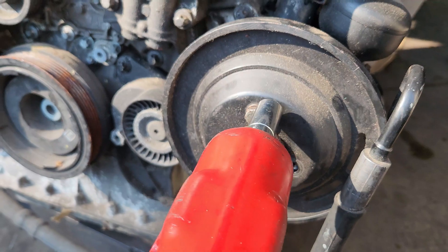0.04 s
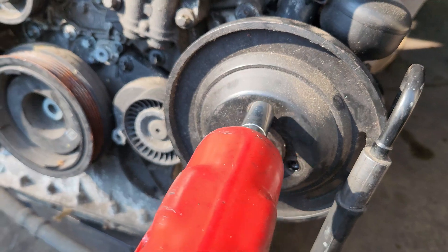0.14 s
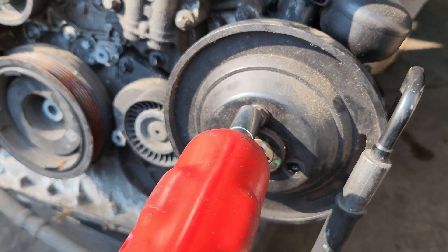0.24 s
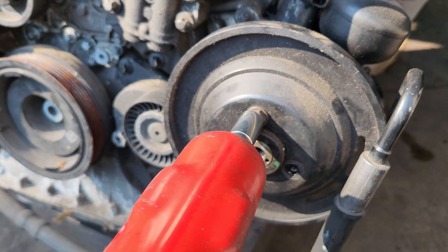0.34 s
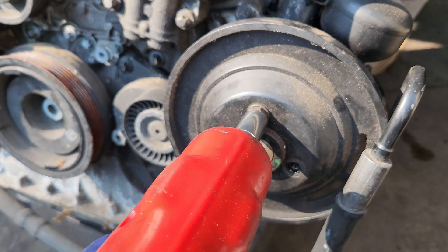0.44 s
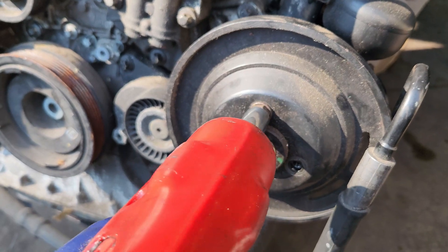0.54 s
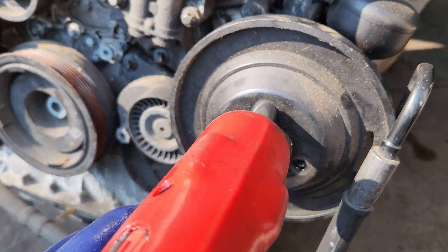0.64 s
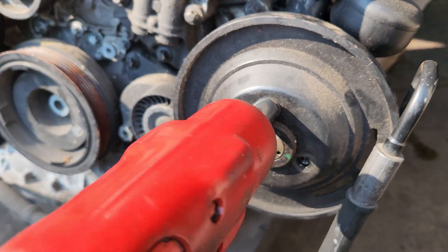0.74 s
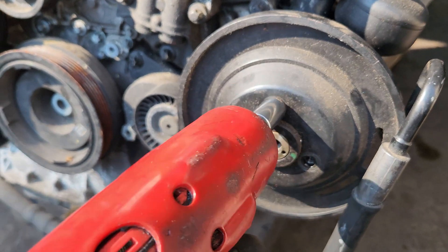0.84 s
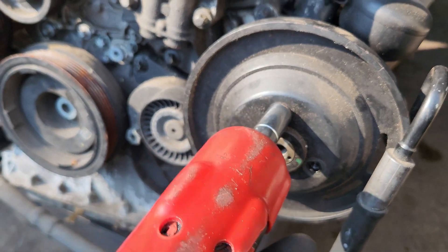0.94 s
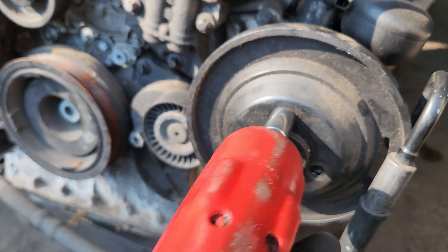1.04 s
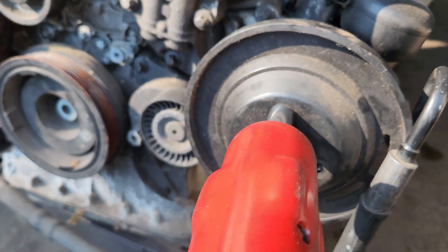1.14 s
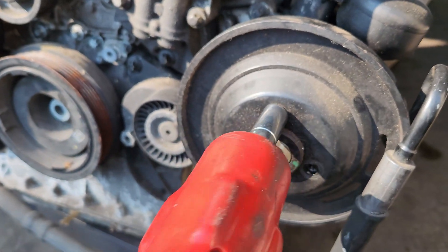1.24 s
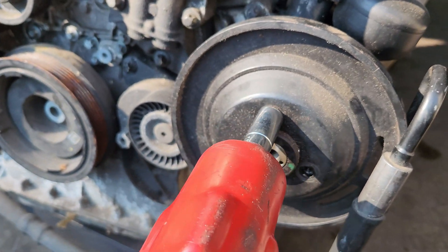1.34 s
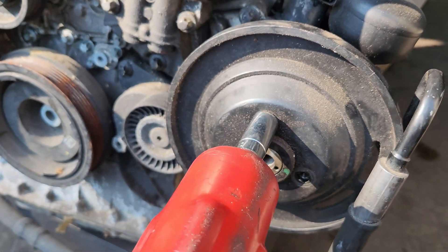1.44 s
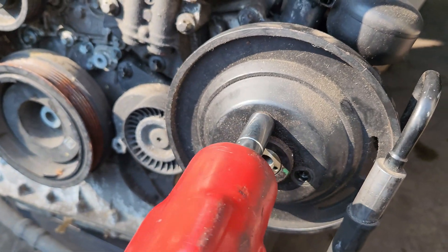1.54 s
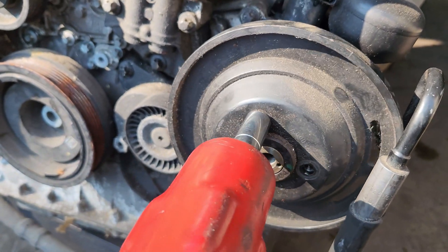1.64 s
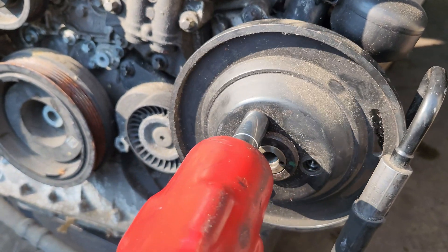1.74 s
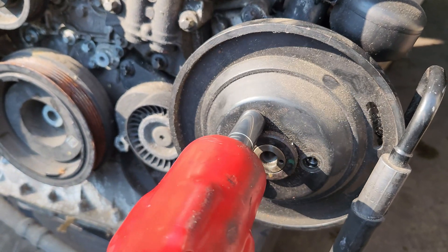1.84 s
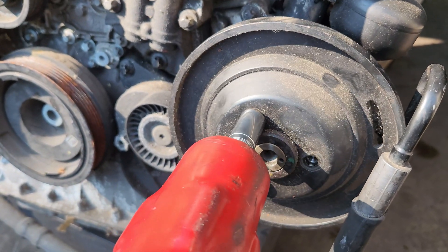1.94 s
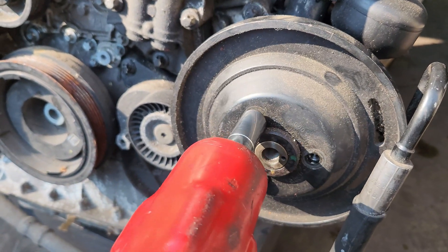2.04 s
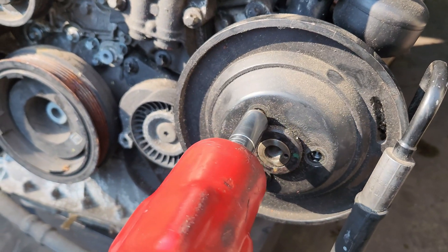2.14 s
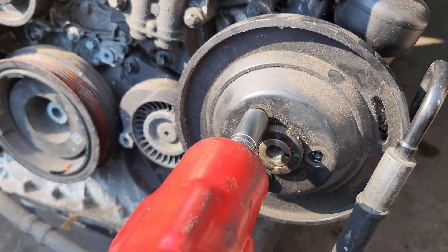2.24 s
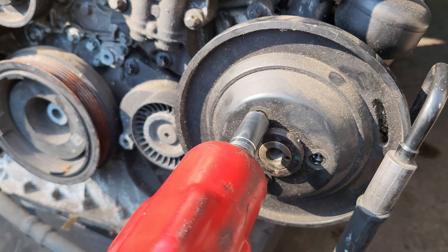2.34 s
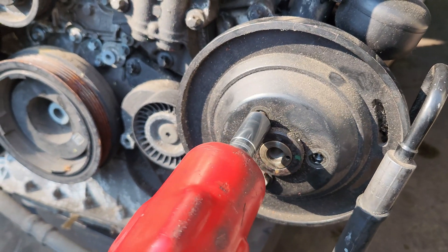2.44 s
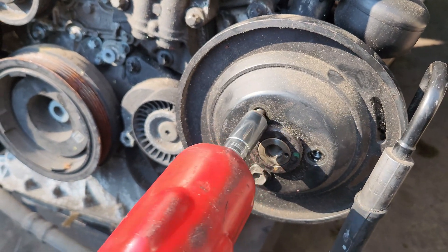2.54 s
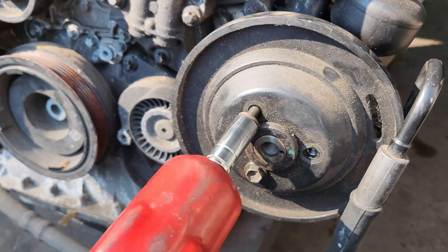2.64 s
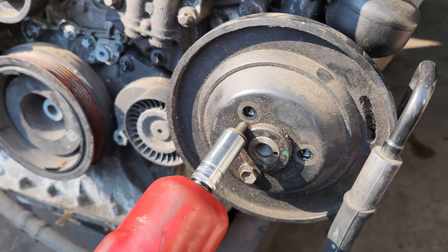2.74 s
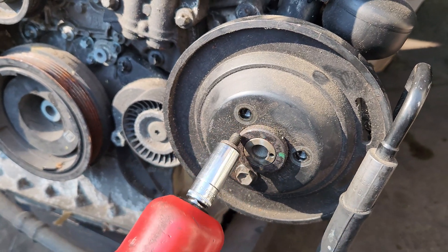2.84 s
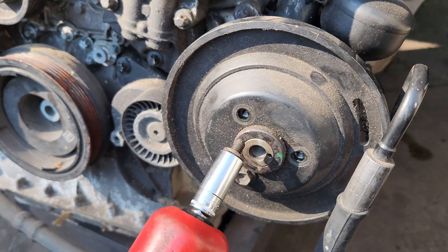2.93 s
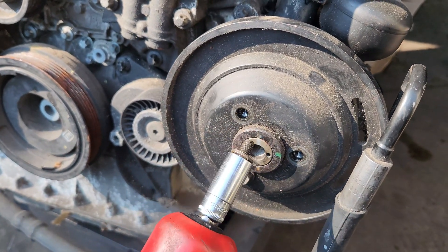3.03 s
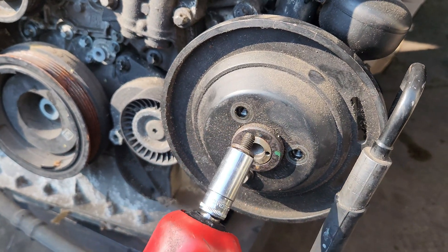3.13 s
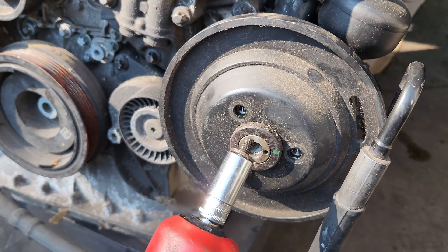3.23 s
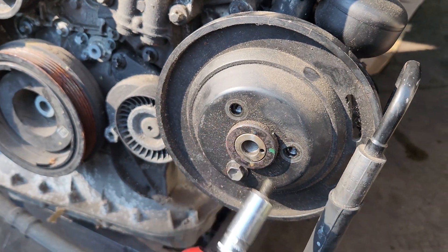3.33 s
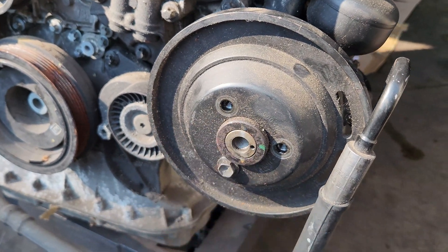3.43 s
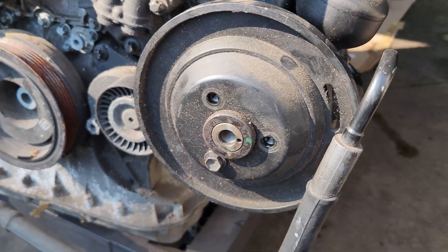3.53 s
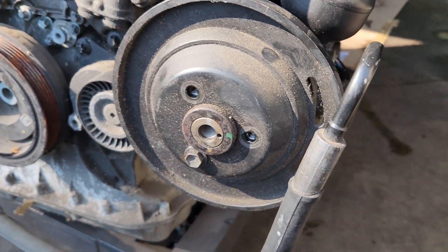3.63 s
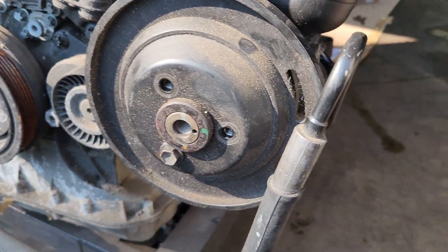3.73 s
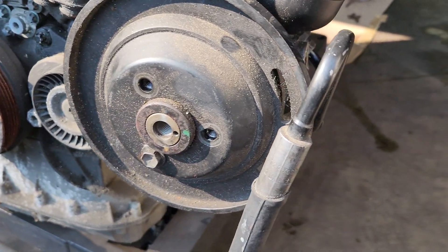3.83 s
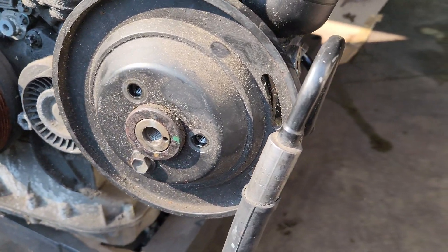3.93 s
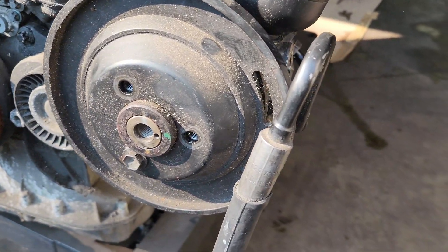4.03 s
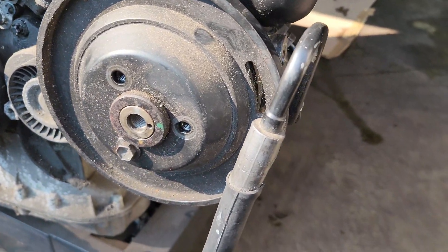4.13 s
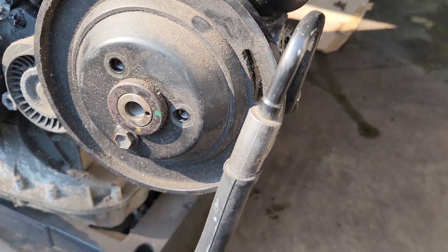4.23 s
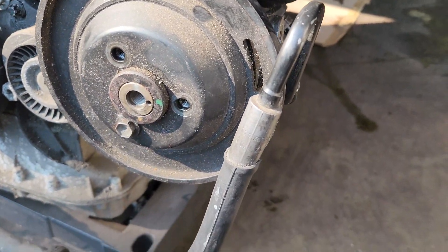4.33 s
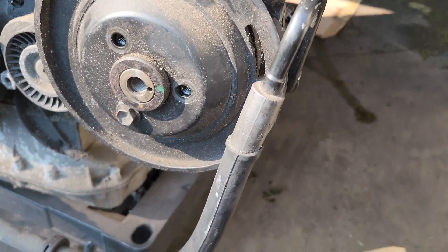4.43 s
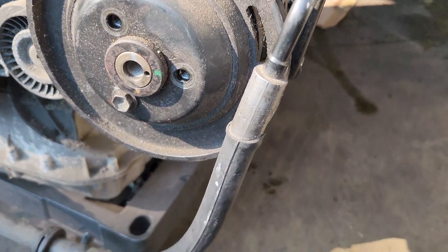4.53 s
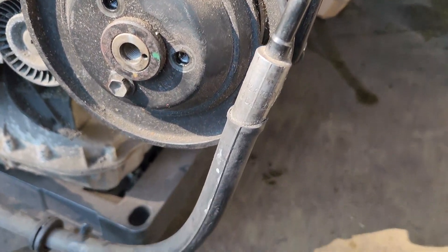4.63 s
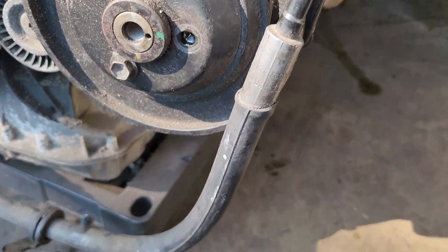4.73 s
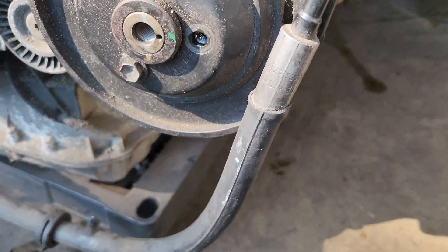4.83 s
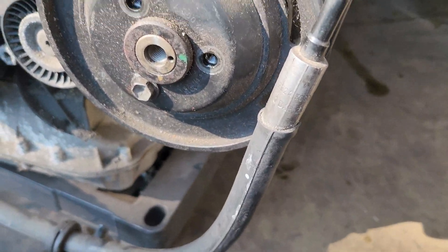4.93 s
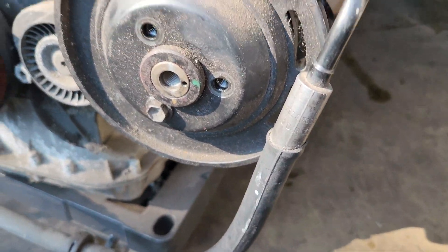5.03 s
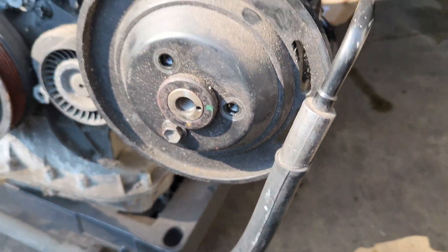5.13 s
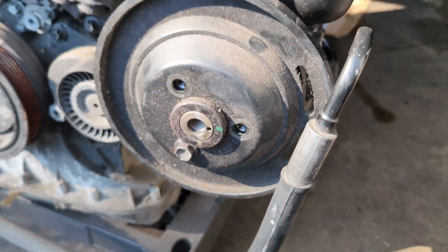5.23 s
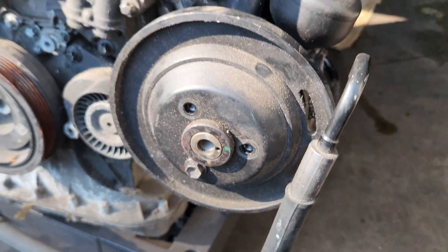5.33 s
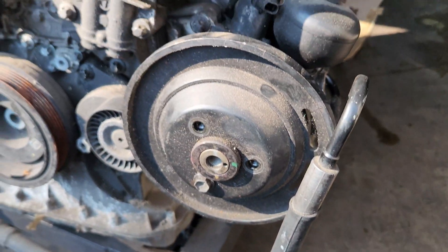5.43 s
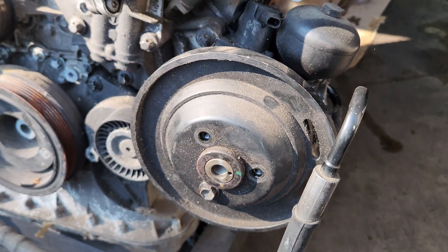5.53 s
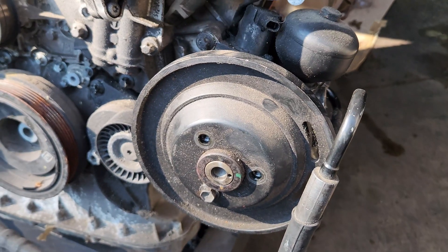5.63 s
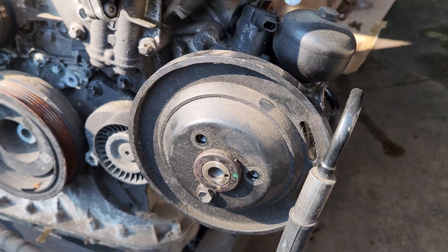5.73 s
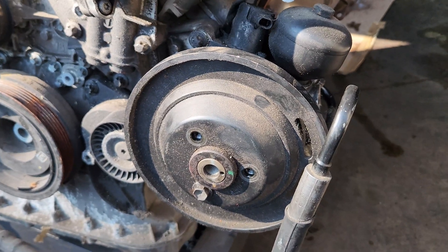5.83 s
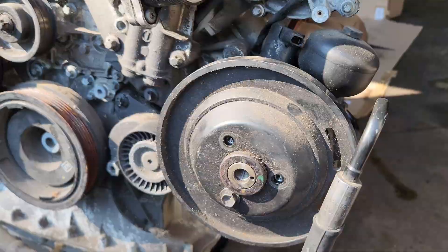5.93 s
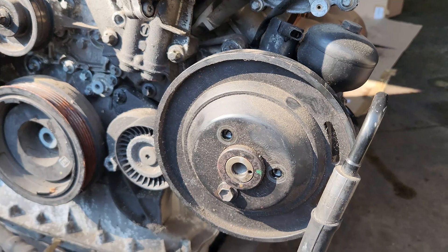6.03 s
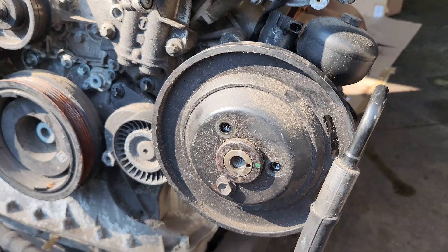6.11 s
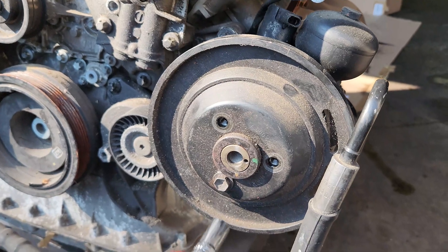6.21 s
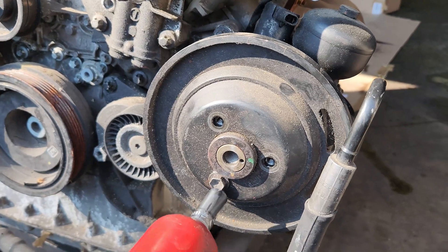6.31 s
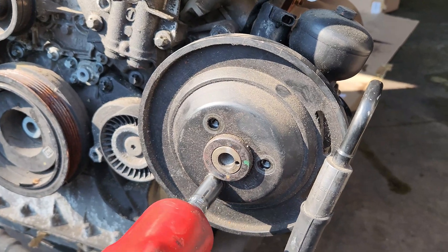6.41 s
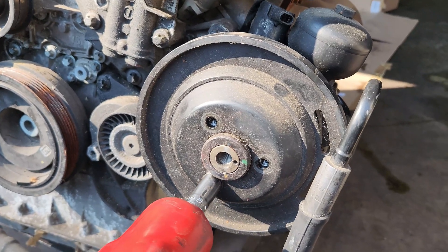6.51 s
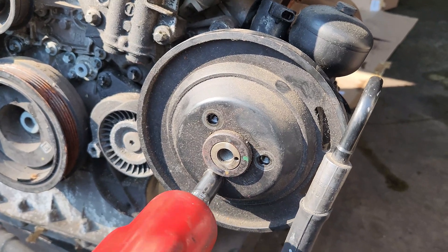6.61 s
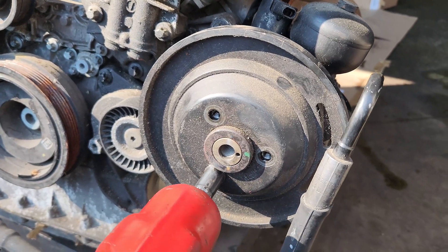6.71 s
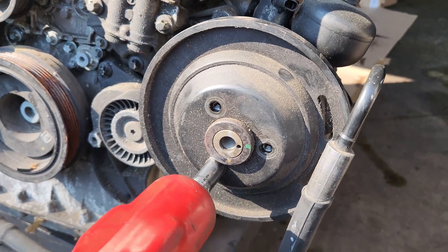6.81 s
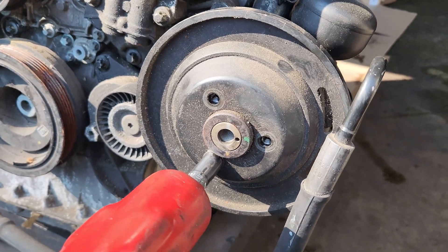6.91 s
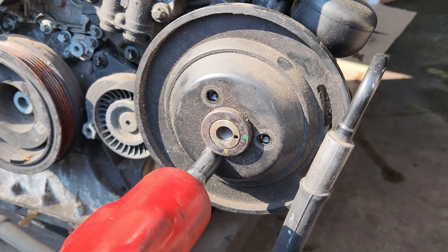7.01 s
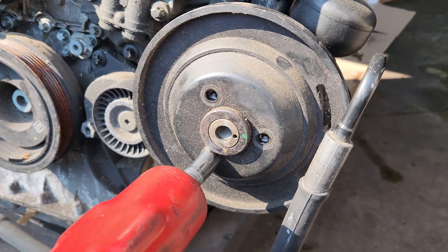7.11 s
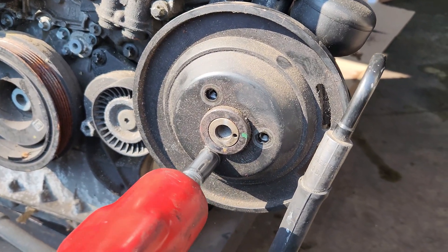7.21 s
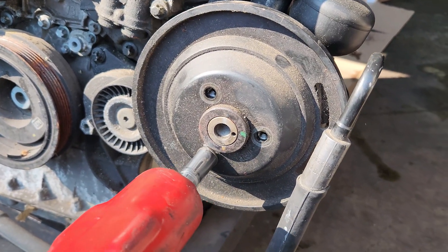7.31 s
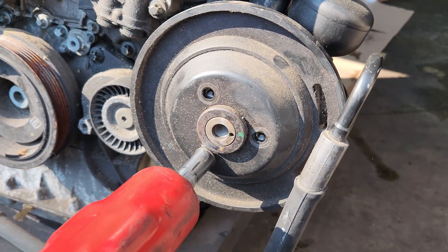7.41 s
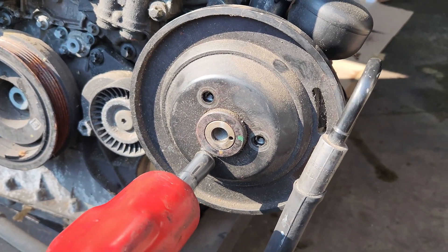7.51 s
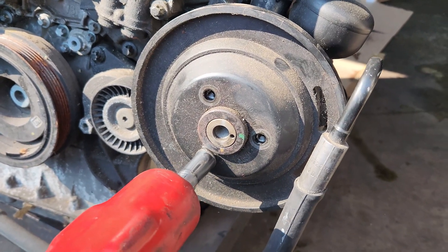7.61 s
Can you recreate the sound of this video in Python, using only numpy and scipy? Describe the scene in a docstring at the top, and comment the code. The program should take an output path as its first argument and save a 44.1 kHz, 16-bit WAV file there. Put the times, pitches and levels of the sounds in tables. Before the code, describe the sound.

Light steel clicks and dull knocks come first, over faint low workshop rumble. Then very loud, irregular hammer blows rattle for under half a second, giving way to whirring gears and a whine that drops abruptly as it stops. A bolt tumbles in a tray with bright clanks, small dry snaps and rustling follow, then firm socket taps and another burst of blows and whine, close and dry in a small-sounding room.

```python
"""Impact wrench on pulley bolts

A cordless impact wrench, close to a two-port microphone, undoes pulley bolts in two runs. The socket taps onto a
bolt and the hammer strikes until it frees: bursts of noise through steel and housing resonances. Motor and gears
whine up and run free, as sines locked to one shaft speed over lumpy noise; the first run ends with braking.
Between the runs a bolt drops into a tray. The workshop rumbles far off and the handling rustles: shaped noise."""
import sys
import numpy as np
from scipy import signal
from scipy.fft import rfft, irfft, next_fast_len
from scipy.io import wavfile
from scipy.ndimage import map_coordinates

SR = 44100
rng = np.random.default_rng(int(sys.argv[2]) if len(sys.argv) > 2 else 0)


def to_wav(s):
    """Save 16-bit WAV."""
    ch = np.atleast_2d(s).T  # columns
    pcm = np.round(np.clip(ch, -1, 1) * 32767)  # PCM
    wavfile.write(sys.argv[1], SR, pcm.astype(np.int16))


def undo_db(level):
    """Turn decibels back into plain size, where 20 dB means ten times bigger."""
    steps = np.asarray(level, float) / 20
    return 10 ** steps


N = 337806

# resonances of tool body and pulley: [f/Hz, width/Hz, level/dB]
HOUSING = [(232, 71, -14), (620, 74, 0.5), (774, 180, -2.5), (994, 360, -3.5)]
# motor whine of each run: [t/s, f/Hz, level/dB, load: 1 pulling up to speed, 0 coasting free, -1 braking]
SPEED = [
    [(1.93, 2087, -34, 0.75), (1.96, 2254, -34, 0.35), (2.0, 2552, -38, 0.82), (2.055, 2825, -41.5, 0.79),
     (2.14, 2765, -36.5, 1), (2.25, 2883, -31.5, 0.33), (2.51, 2957, -23.5, 0.54),
     (2.6, 2987, -29.5, -0.29), (2.67, 2953, -24, -0.37), (2.75, 2780, -35.5, -0.94),
     (2.84, 2346, -36, -1.6), (2.882, 2080, -46, 0.15)],
    [(7.14, 2667, -27, 0.13), (7.165, 2654, -28, 1), (7.21, 2834, -33, 1), (7.25, 2846, -21, 0.53),
     (7.3, 2857, -22, 0.7), (7.36, 2930, -20.5, 0.083), (7.52, 2973, -19.5, 0.21), (7.66, 2996, -22, 0)],
]


def unit(x):
    """Scaled to rms 1."""
    return x / np.sqrt(np.mean(x ** 2) + 1e-20)


def along(points, hz):
    """Values of (Hz, value) points, interpolated on a log frequency axis."""
    f, v = np.transpose(points)
    return np.interp(np.log(hz + 1), np.log(f + 1), v)


def curves(rows):
    """One value per sample for each column, and a gate that is open from the first row to the last."""
    s, *cols = np.transpose(rows)
    t = np.arange(N) / SR
    opening = np.clip((t - s[0]) / 0.008, 0, 1)
    closing = np.clip((s[-1] + 0.01 - t) / 0.01, 0, 1)
    return [np.interp(t, s, c) for c in cols], opening * closing


def wobble(rate, size=N):
    """A smooth random curve, rate knots a second."""
    knots = rng.standard_normal(int(size * rate / SR) + 4)
    return map_coordinates(knots, [np.arange(size) * rate / SR])


def filtered(x, response):
    """x times a complex response of frequency."""
    m = next_fast_len(x.shape[-1] + 8192)
    return irfft(rfft(x, m) * response(np.fft.rfftfreq(m, 1 / SR)), m)[..., :x.shape[-1]]


def noise(spectrum, size=N):
    """Coloured noise of rms 1."""
    return unit(filtered(rng.standard_normal(size), lambda hz: undo_db(along(spectrum, hz))))


def resonant(x, peaks):
    """x through a body's resonances: parallel band-passes of alternating sign."""
    def response(f):
        return sum((-1) ** k * undo_db(db) * 1j * f * width / (centre ** 2 - f ** 2 + 1j * f * width)
                   for k, (centre, width, db) in enumerate(peaks))
    return filtered(x, response)


def hits(events, body, life_s, knock_life):
    """Each contact: a faint swell leading in, a sharp crack, a rattling tail that differs at each port, a knock
    in the body."""
    # spectrum of the crack: [f/Hz, density/dB per Hz]
    crack_colour = [(900, -11), (1500, 0.5), (2200, -1.5), (5000, -3), (7700, -8), (8400, -12), (9200, -27)]
    # spectrum of its added treble: [f/Hz, density/dB per Hz]
    treble_colour = [(7500, -21.5), (9000, -1), (12000, -2), (16000, 2)]
    shorter_db = 54  # a contact this much harder dies twice as fast
    ahead = SR // 50
    t = np.arange(-ahead, SR // 5) / SR

    def fall(t60):
        onset = 1 - np.exp(-np.clip(t, 0, 1) / 0.00048)
        return undo_db(-60 * t / max(t60, 0.004)) * onset

    def steel(rows, treble_db):
        size = (rows, len(t))
        return noise(crack_colour, size=size) + undo_db(treble_db) * noise(treble_colour, size=size)

    out = np.zeros((2, N + SR))
    for s, db, knock_db, treble_db, clank_hz in events:
        t60 = life_s * 2 ** (-db / shorter_db)
        lead_in = undo_db(-30.0 + 60 * t / 0.023) * (t < 0)
        # one part alike at both ports, one part apart
        crack = (lead_in + fall(0.24 * t60)) * (0.52 * steel(1, treble_db) + 1.025 * steel(2, treble_db))
        clank = resonant(crack, [(clank_hz, 0.16 * clank_hz, 6)])  # each contact point favours its own pitch
        rattle = undo_db(-11 + 3.7 * wobble(304, size=len(t))) * fall(1.31 * t60)
        tail = rattle * steel(2, treble_db)
        knock = resonant(rng.standard_normal(len(t)) * fall(knock_life * t60), body)
        knock = filtered(knock, lambda hz: 1 / (1 + 1j * hz / 3000) ** 2)  # a blunt push: little treble
        sound = undo_db(db) * (crack + clank + tail) + undo_db(db + knock_db) * knock / abs(knock).max()
        out[:, round(s * SR) - ahead:][:, :len(t)] += sound
    return out[:, :N]


def ringing(events, modes):
    """Struck steel rings on at its modes, in new proportions each time."""
    t = np.arange(SR // 2) / SR
    out = np.zeros(N + SR)
    for s, db in events:
        for hz, mode_db, t60 in modes:
            chance_db = rng.normal(0, 2)
            level = undo_db(db + mode_db + chance_db - 60 * t / t60)
            out[round(s * SR):][:len(t)] += level * np.sin(2 * np.pi * hz * t)
    return out[:N]


def shop():
    """The far workshop: low rumble, a wavering hum and hiss, each a band of shaped noise."""
    # background levels: [t/s, rumble/dB, hum/dB, hiss/dB]
    background = [(0.0, -38, -55.5, -54), (0.98, -36.5, -51.5, -51.5), (1.58, -37, -57.5, -54.5),
                  (1.73, -36, -40, -49), (2.0, -37.5, -49.5, -50), (2.52, -39, -46.5, -58),
                  (2.9, -40, -58.5, -59.5), (3.2, -40, -58, -59), (4.27, -38, -49.5, -52),
                  (4.91, -40.5, -56.5, -55.5), (5.65, -40, -61.5, -57), (6.16, -39, -50.5, -54),
                  (6.78, -40.5, -49, -52), (7.34, -36.5, -45, -57), (7.66, -39, -42.5, -53)]
    # spectra of the three: [f/Hz, density/dB per Hz]
    rumble, hum, hiss = [(12, -41), (20, -18.5), (54, 4), (87, -2), (124, -5), (152, -9.5), (168, -14),
                         (220, -19.5), (290, -43.5), (480, -120)], [(120, -45), (200, -10.5), (324, -7), (399, -11.5), (460, -37.5),
                                         (600, -52.5), (1010, -120)], [(250, -28), (420, -12.5), (498, -8.5), (597, -7),
                                                      (1050, -8.5), (2060, -10), (2350, -13), (2580, -14),
                                                      (5210, -18.5), (9500, -29.5), (12400, -64.5),
                                                      (20900, -120)]
    (rumble_db, hum_db, hiss_db), _ = curves(background)
    low = undo_db(rumble_db) * noise(rumble) + undo_db(hum_db + 1.3 * wobble(16)) * noise(hum)
    return low + undo_db(hiss_db + 0.65 * wobble(16)) * noise(hiss)


def rustle():
    """Hands and clothes: fine cloth noise that swells and fades with each move."""
    # moves: [t/s of the peak, rise/s per 20 dB, fall/s per 20 dB, level/dB]
    moves = [(1.04, .2, 0.59, -60), (2.97, 0.059, .12, -60), (3.66, 0.41, 0.33, -57), (4.44, .1, 0.27, -37),
             (5.0, 0.15, 0.34, -76.5), (5.6, .2, .12, -59.5), (6.34, 0.37, 0.18, -49.5)]
    # spectrum of cloth: [f/Hz, density/dB per Hz]
    cloth = [(700, -20), (1500, 1.5), (3500, 0.5), (8000, -1.5), (9700, -24.5), (11500, -11.5),
             (16000, -11.5)]
    t = np.arange(N) / SR
    level = undo_db(-70)  # while the hands rest
    for s, rise, fall, db in moves:
        distance = np.where(t < s, (s - t) / rise, (t - s) / fall)
        level = level + undo_db(db - 20 * distance)
    return level * noise(cloth)


def squeak():
    None
    # the glide: [t/s, f/Hz, level/dB]
    glide = [(4.97, 815, -51), (5.0, 900, -49), (5.07, 1110, -59)]
    (hz, db), gate = curves(glide)
    turn = 2 * np.pi * np.cumsum(hz) / SR + 1.5 * wobble(150)
    return gate * undo_db(db) * (np.sin(turn) + 0.43 * np.sin(4 * turn))


def dry_snaps():
    """Small dry snaps nearby, as short contacts with a weak body knock."""
    # snaps: [t/s, crack level/dB, treble over crack/dB, clank f/Hz]
    snaps = [(3.7414, -25.5, -23.5, 3880), (4.7581, -33, -22, 2050), (5.8756, -29.5, -40, 2220)]
    events = [(s, db, -20, treble_db, hz) for s, db, treble_db, hz in snaps]
    return hits(events, HOUSING, life_s=0.013, knock_life=1.1)


def bolt_in_tray():
    """The bolt falls and rolls in a tray, whose resonances colour each knock."""
    # contacts: [t/s, crack level/dB, knock over crack/dB, treble over crack/dB, clank f/Hz]
    drops = [(4.0898, -28, -7.5, -3, 1630), (4.0984, -19, -15, -7.5, 2450), (4.2215, -36, 2.5, -17, 2320),
             (4.2276, -15.5, -9.5, -12, 2420), (4.2564, -18.5, 0.5, -11.5, 2610),
             (4.2765, -19.5, -4, -10.5, 1430), (4.3221, -28, 1, -12, 1950), (4.3532, -8.5, -8.5, -23, 2100),
             (4.3717, -25, -9, 4.5, 2380), (4.4001, -4, -13, -5, 4230), (4.4148, -19, -7, -16, 1680),
             (4.4743, -14, -10, -25.5, 2800), (5.0207, -31, -13.5, -26.5, 2850),
             (5.0628, -31, -5.5, -36.5, 6330), (5.0754, -31.5, -10, -7.5, 3620),
             (5.0963, -40, -9, -7, 3500)]
    # resonances of the tray: [f/Hz, width/Hz, level/dB]
    tray = [(107, 61, -13), (171, 37, 4), (436, 96, -5), (900, 330, -8.5)]
    return hits(drops, tray, life_s=0.043, knock_life=0.81)


def socket_taps():
    """The socket meets bolt and pulley; taps that leave it free let its steel modes ring."""
    # contacts: [t/s, crack level/dB, knock over crack/dB, treble over crack/dB, clank f/Hz]
    taps = [(0.0473, -31, -11, -21.5, 2760), (0.0574, -34.5, -15, -12.5, 2780),
            (0.3426, -15, 0.5, -6.5, 2130), (0.369, -37, -4, -30, 1500), (0.4, -42.5, 7, -30, 2500),
            (0.4628, -26, -7, -35, 2880), (0.6194, -54.5, 18, -20, 1430), (0.6878, -22.5, -2, -37, 2280),
            (0.7054, -33.5, 1, -21, 2840), (0.828, -48, 8, -25, 1200), (0.8525, -38, 8, -14.5, 4470),
            (0.8649, -22, -7, -8, 4930), (0.8774, -25, -2, -13.5, 2090), (0.9098, -37, 1.5, -18.5, 1640),
            (0.9755, -44, 5, -25, 1300), (1.0824, -17.5, 9, -36, 1040), (1.1378, -27.5, -7, -14, 2930),
            (1.1772, -37.5, -0.5, -19.5, 2050), (1.304, -43.5, -2, -22, 3030), (2.3471, -27, 8, -8, 1100),
            (6.4188, -13, -5, -13.5, 1300), (6.4443, -19.5, -12, -13, 3050), (6.4762, -12, -9, -16, 2570),
            (6.8164, -40, 7, -10.5, 1410), (7.2385, -27, 8, -11, 1100)]
    # taps that leave the socket free to ring: [t/s, first mode/dB, other modes/dB]
    pings = [(.346, -41.5, -56), (1.083, -54, -62), (6.477, -44, -30)]
    # modes of the socket, the first rings most readily: [f/Hz, level/dB, t60/s]
    socket = [(3793, 0, .32), (2480, 0, .08), (3050, -6, .11), (6029, -21, .4)]
    first = ringing([(s, db) for s, db, _ in pings], socket[:1])
    others = ringing([(s, db) for s, _, db in pings], socket[1:])
    return hits(taps, HOUSING, life_s=0.025, knock_life=0.51) + first + others


def socket_slaps():
    """The spinning socket slaps the bolt head on some turns: short, bright contacts."""
    # slaps: [t/s, crack level/dB]
    slaps = [(2.2029, -34), (2.2393, -30), (2.2742, -31), (2.3116, -28), (2.383, -29), (2.4518, -28),
             (2.4872, -28), (2.5566, -34), (2.6055, -34), (7.3625, -19), (7.3979, -18), (7.5016, -19),
             (7.5355, -15)]
    events = [(s, db, -12, 8, 7500) for s, db in slaps]  # knock dB, treble dB, clank Hz
    return hits(events, HOUSING, life_s=0.013, knock_life=1.1)


def hammer_blows():
    """Hammer blows and rattles of the anvil; a higher clank knocks the housing less."""
    # blows: [t/s, crack level/dB, treble over crack/dB, clank f/Hz]
    blows = [(1.5164, -27.5, -19, 2200), (1.5559, -4, -10.5, 3000), (1.587, -7.5, -20, 1330),
             (1.6329, -4, -0.5, 3260), (1.6407, -5, -4, 2130), (1.6524, -6.5, -1.5, 3100),
             (1.6786, -11.5, -9.5, 2140), (1.718, -2, 2, 4770), (1.7367, -7, 0, 5000),
             (1.7554, -11.5, -7, 2210), (1.7853, -7.5, -2.5, 3160), (1.7993, -6, 0.5, 4870),
             (1.8371, -5, 1, 2170), (1.8524, -10.5, -15, 2160), (1.8692, -15.5, -10.5, 1400),
             (1.8995, -7.5, -4, 1560), (1.9081, -14, -8, 3690), (1.9265, -16, -10.5, 3680),
             (1.9395, -14.5, -13, 3940), (1.9589, -19, -19, 4380), (2.8545, -17.5, -28, 4520),
             (2.8838, -16.5, -1, 5250), (7.0695, -24.5, -26, 4000), (7.0883, -18.5, -8, 6800),
             (7.0915, -13.5, -14, 4800), (7.1216, -10.5, -46, 2800), (7.1342, -7.5, -27.5, 3970),
             (7.152, -11.5, -23.5, 3900), (7.1552, -14.5, -23, 2440), (7.1654, -13.5, -24, 4600),
             (7.1854, -13.5, -24.5, 3420)]
    # modes of the anvil: [f/Hz, level/dB, t60/s]
    anvil = [(3800, -22, 0.08), (8890, -25, .25), (9015, -26, .25), (12140, -21, .07), (12500, -23, 0.05)]
    thud_db, thud_fall_db = -6.5, 4.5  # knock over the crack for a 2 kHz clank; loss per octave above
    freed_s = 1.95  # the bolt comes loose; until then the anvil is struck hard enough to sing
    events = [(s, db, thud_db - thud_fall_db * np.log2(hz / 2000), treble_db, hz)
              for s, db, treble_db, hz in blows]
    # the brighter the blow, the more it sings
    singing = [(s, db + treble_db) for s, db, treble_db, _ in blows if s < freed_s]
    return hits(events, HOUSING, life_s=0.047, knock_life=0.7) + ringing(singing, anvil)


def throb():
    """Near 1 once per turn of the loosely held socket, near 0 between."""
    # when the socket's loose side comes round, once per run: [t/s]
    knock_at = [2.348, 7.24]
    spindle = 106  # motor whine cycles per turn of the socket
    out = np.zeros(N)
    for rows, s in zip(SPEED, knock_at):
        (hz, *_), gate = curves(rows)
        turns = np.cumsum(hz) / SR / spindle
        since_knock = turns - turns[round(s * SR)] + 0.074 * wobble(9.1)
        out += gate * np.cos(np.pi * since_knock) ** 2
    return out


def whirr(beat):
    """Fan air and loose gear teeth, lumpy; the spinning socket drums on the housing once a turn."""
    # trigger held, one list per run: [t/s, whirr level/dB, housing drone level/dB]
    runs = [
        [(1.52, -49.5, -46), (1.55, -24, -34.5), (1.575, -63, -34), (1.62, -28.5, -32.5), (1.8, -31, -27.5),
         (1.94, -31, -36), (1.98, -30.5, -42.5), (2.14, -27.5, -39.5), (2.47, -27.5, -39), (2.75, -27.5, -45),
         (2.866, -31.5, -44), (2.875, -68, -53)],
        [(7.09, -21, -25), (7.17, -23.5, -52), (7.21, -22, -35.5), (7.66, -20, -37.5)],
    ]
    # spectrum of the whirr: [f/Hz, density/dB per Hz]
    colour = [(900, -33), (1400, -5.5), (1850, -11.5), (2150, -7.5), (3400, -7.5), (5100, -4.5), (6300, -7),
              (6900, -7.5), (7300, 1.5), (7700, -5), (8300, -7), (9700, -20), (11700, -15), (16000, -13.5)]
    out = np.zeros(N)
    for rows in runs:
        (whirr_db, drone_db), gate = curves(rows)
        lumps_db = 0.7 * wobble(35) + 1.6 * wobble(400) + 0.69 * beat
        teeth = unit(undo_db(lumps_db) * noise(colour))
        drumming = undo_db(2.4 * wobble(45) + 3.8 * beat) * rng.standard_normal(N)
        drum = unit(resonant(drumming, HOUSING))
        out += gate * (undo_db(whirr_db) * teeth + undo_db(drone_db) * drum)
    return out


def whine(beat):
    """Tones locked to one shaft speed; load and braking swell the gear tones, which flutter and throb."""
    # motor, second mesh, third mesh, slots: [multiple of the motor whine]
    ratios = [1, 32 / 27, 48 / 27, 8 / 3]
    # where each of these falls between the ports: [t/s, left over right/dB, left leads by/rad]
    aims = [
        [(2.0, -1, 1.4), (2.3, -6.5, 2.9), (2.6, -6, 3.58), (2.85, 12.5, 4.1), (7.2, 3, 2.14), (7.42, -15, 4.2),
         (7.66, -13, 6.2)],
        [(2.0, 1, 1.84), (2.8, -8.5, 2.9), (7.2, -2, 6), (7.66, -12, 5.9)],
        [(2.0, -4, .6), (7.66, 0, -0.39)],
        [(2.0, 2.5, -2.5), (2.8, 12, -2), (7.2, -5, -1), (7.66, 0, 3.5)],
    ]
    # second mesh, third mesh, slots, before closeness, flutter and throb:
    # [running free/dB, gain under full load/dB, gain under full braking/dB, loss/dB per 100 Hz under faint_hz]
    gears = [(-33.5, 4.6, 4.5, 0), (-43, 18.7, 5.5, -1), (-37.5, 11.7, 12, 5)]
    # gear tones of each run, by how close the tool is held: [gain/dB]
    closeness = [-1.5, 5]
    faint_hz = 2720  # motor whine under which a gear tone's level shifts with speed
    shakes, throbs_db = [0.2, 1.4, 2.0, 0.1], [0, 6, 14, 0]  # per tone: radians, dB
    side = np.array([[0.5], [-0.5]])
    out = np.zeros((2, N))
    for rows, near_db in zip(SPEED, closeness):
        (hz, motor_db, load), gate = curves(rows)
        pulling, braking = np.clip(load, 0, 1), np.clip(-load, 0, 1)
        slowness = np.clip(faint_hz - hz, 0, None) / 100
        levels = [motor_db]
        for free, pull, brake, slow in gears:
            levels.append(near_db + free + pull * pulling + brake * braking - slow * slowness)
        turn = 2 * np.pi * np.cumsum(hz) / SR
        for ratio, db, aim, shake, throb_db in zip(ratios, levels, aims, shakes, throbs_db):
            (left_db, lead), _ = curves(aim)
            pan = undo_db(side * left_db)
            pan = pan / np.sqrt(np.mean(pan ** 2, 0))
            level = undo_db(db + 1.85 * wobble(45) + throb_db * (beat - 1.3)) * pan
            out += gate * np.sqrt(2) * level * np.sin(ratio * turn + shake * wobble(100) + side * lead)
        # first mesh tone, an octave under the second, of opposite sign at the right port
        first = undo_db(levels[1] - 7.5 + 4 * braking + 1.1 * wobble(45))
        first = first * np.sin(ratios[1] / 2 * turn + shakes[1] * wobble(100))
        out += gate * first * [[1], [-0.4]]
    return out


def spread(x, alike):
    """Steady noise arrives from many sides: its treble differs from port to port."""
    hz, _, z = signal.stft(x, SR, nperseg=256)
    angle = np.arccos(np.clip(along(alike, hz), 0, 1))[:, None] / 2
    other = np.sin(angle) * z * np.exp(2j * np.pi * rng.random(z.shape))
    return signal.istft(np.cos(angle) * z + np.array([other, -other]), SR, nperseg=256)[1][:, :N]


def ports(pair, shade):
    """The left port hears first, and each port is shaded differently."""
    # how far the left port is ahead: [f/Hz, phase/rad]
    lead = [(100, .1), (650, .3), (1300, 1.74), (2300, 5.72), (3400, 10.39), (16000, 29.24)]

    def response(f):
        level = undo_db(np.outer([0.5, -0.5], along(shade, f)))
        return level * np.exp(np.outer([0.5j, -0.5j], along(lead, f)))
    return filtered(pair, response)


def walls(pair):
    """The room's answer: a noise tail in which each frequency dies at its own speed."""
    # decay of the room: [f/Hz, t60/s]
    decay = [(300, 0.22), (2000, 0.19), (10000, 0.062)]
    hz, t, z = signal.stft(rng.standard_normal((2, SR // 2)), SR, nperseg=256)
    tail = signal.istft(z * undo_db(-60 * t / along(decay, hz)[:, None]), SR, nperseg=256)[1]
    late = np.pad(pair, ((0, 0), (60, 0)))  # the answer starts 60 samples late
    return signal.fftconvolve(late, tail / np.linalg.norm(tail[0]), axes=1)[:, :N]


def scene():
    """Tool, taps and bolt near the microphone, in the workshop."""
    # share the two ports have in common, near sounds and the shop: [f/Hz, share]
    near_alike, far_alike = [(100, 1), (700, .93), (2500, 0.35), (5000, 0.2), (9000, 0.13)], [(100, 0.99), (300, 0.98), (650, .5), (1300, 0.1), (5000, 0.05)]
    # the housing's shadow on near sounds, and the shading of the shop: [f/Hz, left over right/dB]
    near_shade, far_shade = [(300, 0), (1300, 3), (2300, 2), (3400, 0), (5000, -1.5), (7500, 3.5),
                             (12000, 0)], [(300, 1), (650, 1.5), (1300, -3), (2300, -6.5), (5000, -6.5),
                                            (7500, -0.5), (12000, -3)]
    far = ports(spread(shop() + rustle(), far_alike), far_shade)
    struck = dry_snaps() + bolt_in_tray() + socket_taps() + socket_slaps() + hammer_blows()
    beat = throb()
    steady = spread(whirr(beat) + squeak(), near_alike)
    near = ports(struck + steady, near_shade) + whine(beat)
    return far + near + undo_db(-12.5) * walls(struck)


def band_limit(x):
    """A steep low-pass at the top of the band."""
    return signal.sosfilt(signal.butter(12, 16820, fs=SR, output="sos"), x)


def record(dry):
    """The loudest blows clip softly and the top of the treble is cut off."""
    clipped = dry / (1 + abs(dry) ** 6) ** (1 / 6)
    top_cut = [(15950, -0.5), (16100, -23.5), (16600, -32.0), (16850, -49)]  # Hz, dB
    mix = filtered(clipped, lambda hz: undo_db(along(top_cut, hz)))
    return band_limit(mix)


dry = scene()
out = record(dry)
to_wav(out)
```